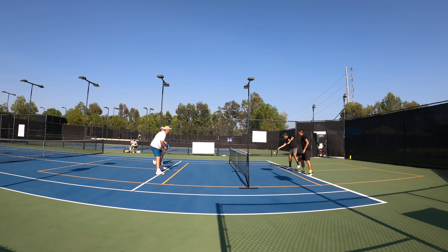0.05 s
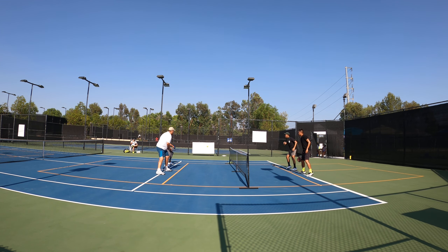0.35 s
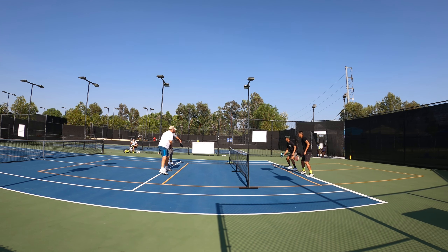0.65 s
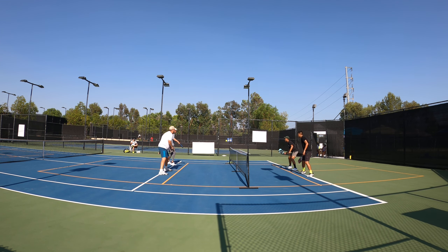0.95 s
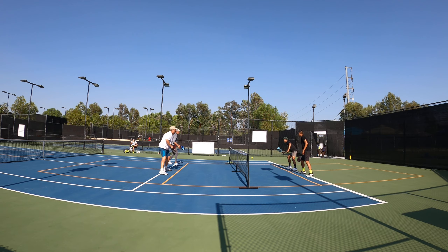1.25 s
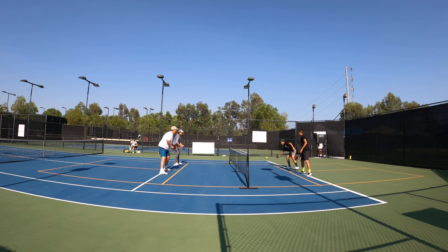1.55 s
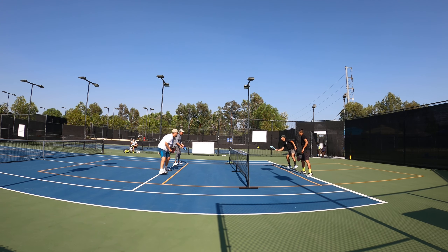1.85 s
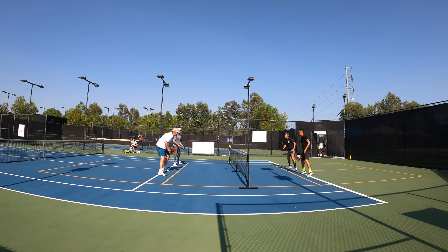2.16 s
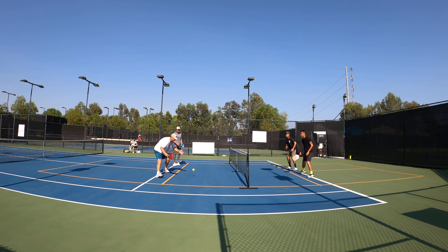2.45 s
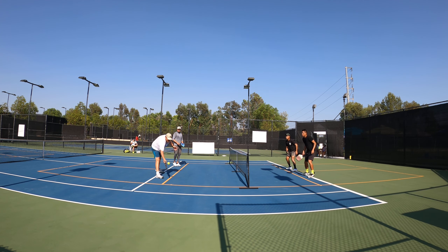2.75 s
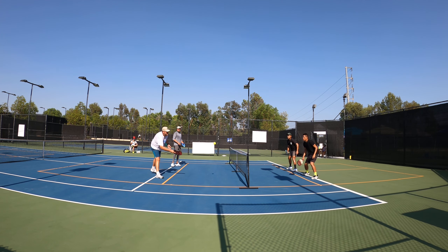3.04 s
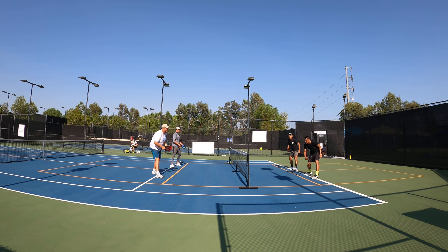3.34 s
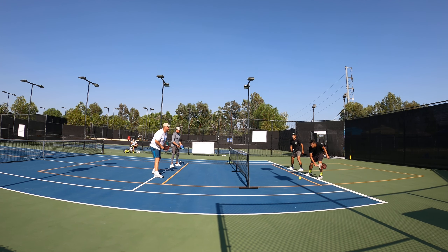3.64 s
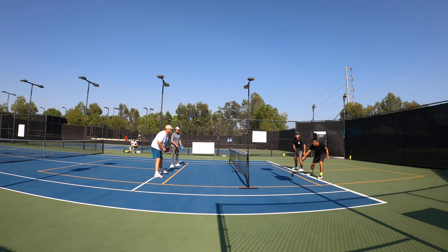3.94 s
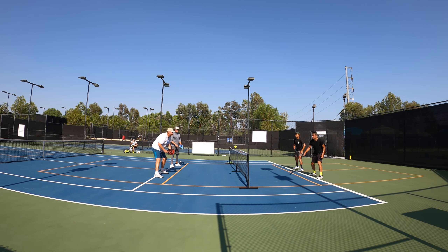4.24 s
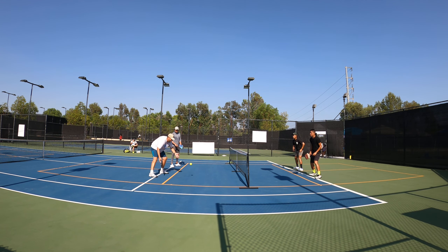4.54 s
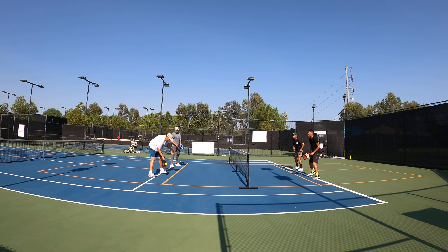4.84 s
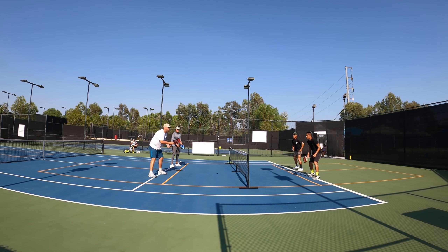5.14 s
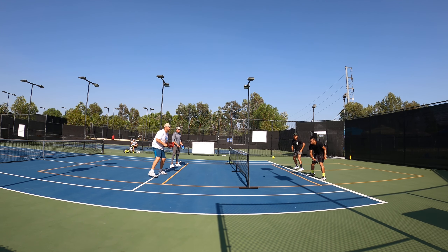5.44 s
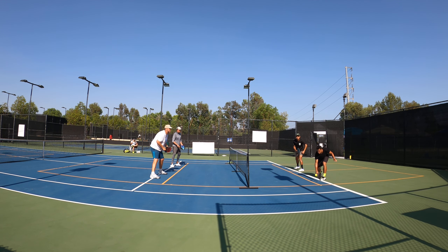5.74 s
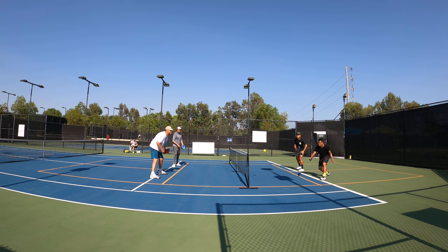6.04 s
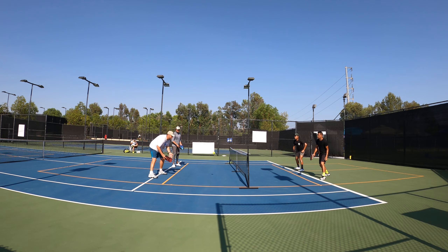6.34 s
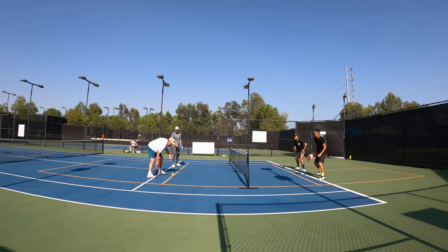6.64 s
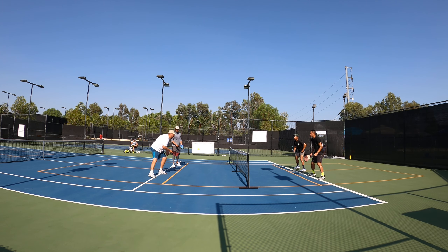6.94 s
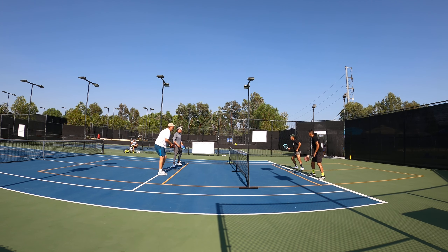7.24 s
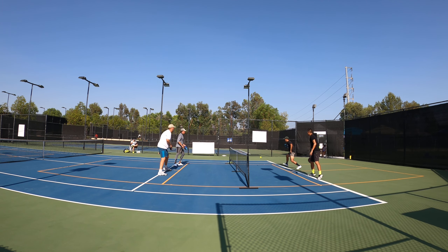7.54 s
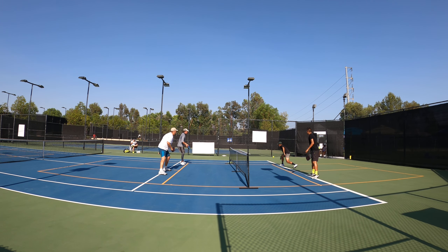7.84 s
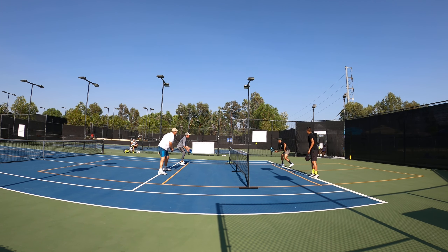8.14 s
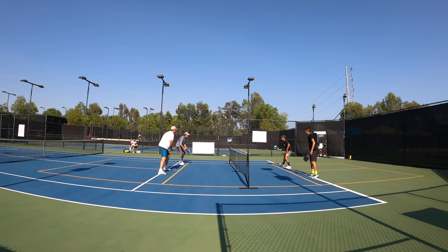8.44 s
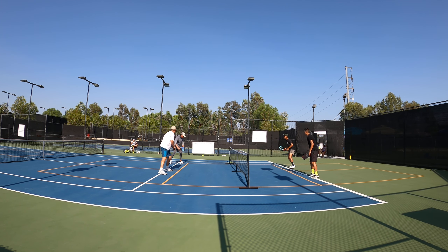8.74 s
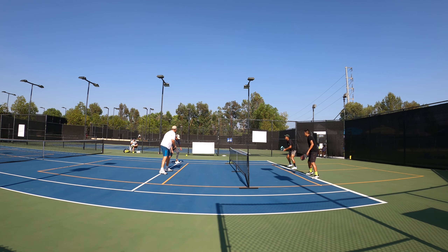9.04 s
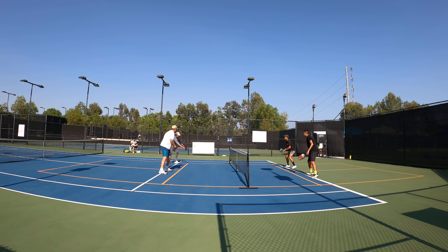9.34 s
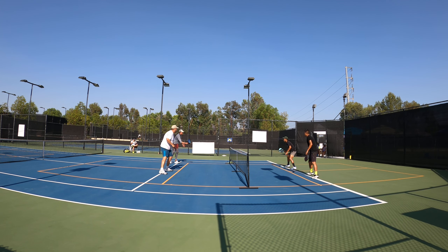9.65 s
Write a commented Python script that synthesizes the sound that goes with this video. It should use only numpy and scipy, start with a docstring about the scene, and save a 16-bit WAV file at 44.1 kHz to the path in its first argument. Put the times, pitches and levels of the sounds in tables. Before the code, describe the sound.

A pickleball rally is heard from beside the net on an outdoor hard court, over a steady low hum of distant traffic and very faint bird trills. It opens with short sneaker squeaks, a few dull distant pops and sharp, hollow paddle hits at about 0.2 and 0.7 seconds. Another hit comes at 1.9, and the plastic ball clicks on the court several times between 1.5 and 3 seconds, with a squeak at 2.4. From 4 seconds the paddles pop about once a second, at 4, 5, 6, 7 and 8.1, each just after a bounce and each with a short echo from the fences. Rubber soles scuff over grit throughout, squeaking around 4.7, 6.5 and 7.4 seconds. Near 9 seconds a shoe skids and squeaks, the ball bounces twice more, and a vehicle's hum rises slightly at the end.

```python
"""A pickleball rally outdoors

Heard from beside the net: paddles pop like stiff drumheads, and the hollow plastic ball clicks
as it bounces on the hard court. Rubber soles scuff over grit and squeak as they stick and slip.
The fences throw back echoes, and there are a few dull, distant paddle pops.
Distant traffic and its engines hum underneath, and far birds trill faintly."""
import sys
import numpy as np
from scipy import signal
from scipy.fft import rfft, irfft, next_fast_len
from scipy.io import wavfile
from scipy.ndimage import map_coordinates

SR = 44100
rng = np.random.default_rng(int(sys.argv[2]) if len(sys.argv) > 2 else 0)


def pcm_store(signal):
    """Save signal as 16-bit PCM."""
    levels = np.round(np.clip(np.atleast_2d(signal), -1, 1) * 32767)
    wavfile.write(sys.argv[1], SR, levels.astype(np.int16).T)


N = 431722

# In the tables, t is time, f is frequency and t60 is the time a sound takes to fade by 60 dB.
# Pan is left minus right. Hardness is the frequency above which a hit is dulled.
# slowly swelling traffic: t/s, rumble level/dB, tyre hiss level/dB
TRAFFIC_LEVELS = [(0.0, -30, -49.5), (0.24, -32.5, -48), (3.02, -31, -47.5), (3.21, -31.5, -49),
                  (3.63, -30.5, -48), (9.16, -29.5, -47.5), (9.79, -29, -49)]
# tone colour of road rumble and of tyre hiss: f/Hz, level/dB
RUMBLE_SPECTRUM = [(15, -9), (30, -12), (50, -4), (65, -1), (85, -0.5), (120, -3), (160, -10), (220, -12),
                   (300, -19), (450, -29.5), (800, -38), (2000, -91.5)]
TYRE_SPECTRUM = [(150, -17), (400, -1.5), (700, -3), (1000, 2.5), (1300, 0.5), (1800, -4), (2500, -11.5),
                 (3500, -19), (4500, -23.5), (7000, -29.5), (9500, -39), (12500, -47.5), (16000, -63)]
# firing tones of three distant engines: t/s, f/Hz, level/dB
FIRING_A = [(0, 125.8, -36), (1.2, 129.3, -40.5), (2.5, 134.9, -37), (3.8, 128.5, -36), (5.2, 134.9, -37),
            (6.3, 146.2, -30.5), (7.1, 150.1, -34), (7.6, 151.3, -33), (8.3, 153.3, -48),
            (9.79, 138.3, -32.5)]
FIRING_B = [(0, 112.7, -48.5), (2.4, 111.4, -38), (3.8, 111, -30), (4.8, 114.1, -41), (6.002, 114.9, -33.5),
            (7.2, 122.4, -31.5), (8.2, 121.6, -31), (8.999, 116.2, -33), (9.79, 113.6, -31.5)]
FIRING_C = [(0, 177.1, -56.5), (0.999, 179.2, -37), (1.6, 173.9, -48.5), (2.7, 178.4, -34.5),
            (3.4, 175.8, -47), (3.9, 175.2, -39), (4.6, 170.8, -48.5), (9.79, 172.4, -68)]
# a vehicle drawing near: t/s, level/dB
VEHICLE_SWELL = [(0, -74), (8.6, -55), (9.2, -52.5), (9.5, -34.5), (9.79, -34.5)]
# the tones in its hum: f/Hz, level/dB
VEHICLE_TONES = [(194, -7.5), (222, -2.5), (248, -5), (280, -20.5), (307, -10), (334, -11.5)]
# far bird trills: t/s, length/s, start f/Hz, end f/Hz, level/dB
BIRD_TRILLS = [(0.019, 0.21, 4100, 4120, -63), (1.002, 0.16, 4100, 4330, -68),
               (2.09, 0.33, 4560, 4260, -62.5), (2.113, 0.26, 3440, 3270, -63),
               (5.329, 0.52, 4330, 4360, -64), (6.05, 0.57, 4470, 4670, -68.5),
               (7.078, 0.17, 4500, 4240, -64)]
# tone colour of the court's echo tail: f/Hz, level/dB
TAIL_SPECTRUM = [(150, -14.5), (500, -10.5), (900, 8), (2000, 4.5), (4000, 2), (8000, -2.5), (14000, -22)]
# fence echoes, duller from further away: delay/s, level/dB, top f/Hz
FENCE_ECHOES = [(.031, -38.5, 5970), (.0615, -36, 4930), (.142, -25.5, 1200), (.2, -24, 1510)]
# tone colour of grit under a sole: f/Hz, level/dB
GRIT_SPECTRUM = [(500, -27), (1500, 1), (3000, 5.5), (5000, 1.5), (7000, 0.5), (9000, -10.5), (12500, -16),
                 (14000, -33), (16000, -40)]
# soles sliding on gritty paint, plus the short hiss of the distant pop at 8.19 s: middle t/s, length/s,
# level/dB, tilt/(dB per octave)
SOLE_SCUFFS = [(0.298, 0.04, -51, -2), (0.472, 0.035, -46, -15), (0.573, .11, -46, -7),
               (0.567, 0.099, -59, -11), (0.605, 0.048, -50.5, -1.5), (0.683, 0.022, -53, 4),
               (1.185, .1, -71, 8), (2.262, 0.26, -56, -1.5), (2.376, 0.06, -43, -1.5),
               (2.672, 0.12, -45, -1.5), (2.866, 0.052, -44, -7), (2.928, 0.17, -63, 16),
               (3.359, 0.19, -58, -3.5), (3.643, 0.064, -45, -8), (3.86, 0.051, -57, 2),
               (4.204, 0.39, -62.5, -3), (4.653, 0.016, -44.5, -2), (5.322, 0.046, -42.5, -4.5),
               (5.816, 0.32, -65, 3), (6.407, 0.054, -46.5, -6), (6.465, 0.078, -40.5, -10),
               (6.502, 0.031, -45.5, -5), (7.243, .037, -60, 15), (7.321, 0.11, -53, 3),
               (7.398, 0.1, -45.5, -4.5), (7.485, 0.18, -63, 7), (7.826, 0.22, -60.5, -2),
               (8.037, 0.26, -47, -1.5), (8.19, 0.013, -30, -13.5), (8.47, 0.021, -55, -4),
               (8.585, 0.087, -56, -1.5), (8.72, 0.02, -38.5, -14), (8.746, 0.038, -47.5, -3.5),
               (8.948, .45, -53, -8), (9.104, .06, -45, -5), (9.214, 0.11, -48, -5.5)]
# small sharp ticks (shoe taps, echoed ball clicks, clicks of distant pops): t/s, level/dB, hardness/Hz
SMALL_TICKS = [(.276, -32, 4000), (0.362, -24.5, 2190), (.391, -30.5, 4000), (3.03, -45, 6000),
               (4.7169, -20, 5250), (4.7995, -41.5, 4550), (4.8775, -43, 4990), (4.913, -38.5, 6900),
               (5.095, -49, 6000), (5.739, -43, 5000), (6.543, -37.5, 6470), (6.7, -40.5, 4460),
               (6.937, -35.5, 6000), (8.164, -41.5, 6000), (8.279, -43.5, 6000), (9.4724, -35.5, 6480)]
# treads rasping in a skid: t/s, length/s, centre f/Hz, level/dB
TREAD_RASPS = [(0.42, 0.021, 2380, -35), (0.446, 0.035, 2400, -36), (0.51, 0.11, 2170, -55),
               (4.718, 0.045, 3300, -49), (4.74, 0.048, 5650, -71), (6.488, .02, 3900, -50),
               (7.415, 0.068, 2740, -49), (8.72, 0.66, 1460, -52), (9.17, 0.09, 1920, -40.5),
               (9.184, 0.13, 3600, -59), (9.177, .06, 5300, -56)]
# soles squeaking: t/s, length/s, f/Hz, level/dB, roughness (0-1), share of pitch lost,
# overtones/dB, chatter/dB, echo delay/s, echo/dB (the last three levels relative to the squeak)
SOLE_SQUEAKS = [(0.003, 0.014, 2160, -31, 0.9, 0.14, -6, -2, 0.034, -11),
                (0.017, 0.032, 2000, -27, 0.23, 0.1, -17.5, -5.5, 0.041, -18),
                (0.415, 0.018, 2623, -26, 0.55, 0.045, -15, -26, 0.045, -14),
                (0.429, 0.018, 1946, -19.5, 0.62, 0.23, -17, -16, .028, -28),
                (0.471, 0.023, 2040, -31.5, 0.4, 0.24, -21, -5, 0.049, -21),
                (0.997, 0.03, 2150, -50, 0.05, 0.041, -26, -18, 0.034, -20),
                (1.364, .017, 2070, -37, 0.36, 0.15, -24, -13, 0.041, -15),
                (1.747, 0.015, 2220, -40, 0.44, 0.18, -29, -25, .04, -18),
                (2.3942, 0.0041, 2805, -20, 0, -0.029, -30, -22, .012, -28),
                (2.692, .016, 1890, -35, 0.35, 0.31, -26, -9, 0.047, -12),
                (2.897, 0.015, 2550, -39, 0.37, 0.15, -29, -5, .04, -26),
                (3.63, 0.019, 3130, -37.5, 0.55, 0.13, -27, -16, 0.072, -18),
                (4.717, 0.014, 3290, -30, 0.5, 0.31, -26, -45, 0.066, -15),
                (4.742, 0.012, 2854, -29.5, 0.5, 0.053, -21, -11, 0.024, -15),
                (4.751, 0.0075, 2920, -38.5, 0.5, 0.093, -20, -18, .048, -4),
                (5.307, 0.012, 3090, -41, 0.34, 0.063, -21, -21, 0.048, -14),
                (6.467, 0.011, 2240, -43, 0.6, 0.19, -22, -6, 0.029, -20),
                (6.543, 0.013, 2780, -32, 0.42, 0.09, -13.5, -27, .05, -18),
                (6.556, 0.013, 2980, -39.5, 0.4, 0.01, -26, -22, .06, -12),
                (6.568, 0.013, 2830, -36, .2, 0.12, -20, -25, .013, -11),
                (7.353, 0.053, 3020, -47.5, 0.67, .12, -21, -22, .059, -20),
                (7.418, 0.015, 2664, -22, 0.18, 0.21, -18.5, -23, 0.059, -20.5),
                (7.428, .022, 2625, -38.5, 0.08, -0.085, -17, -3, 0.081, -14),
                (9.195, 0.023, 1734, -22, 0.03, 0.0097, -21, -10, 0.056, -8.5),
                (9.224, 0.028, 1762, -26.5, 0, 0.0023, -28, -13, 0.043, -13.5)]
# ringing tones of the ball's shell: f/Hz, level/dB, t60/s
SHELL_TONES = [(1544, -11, 0.012), (1800, -1, 0.0045), (2560, -13.5, 0.013), (3040, -6.5, 0.0095),
               (4520, -6, 0.0053), (5190, 3, 0.0021), (7400, -10, 0.002), (8500, -6.5, 0.0018),
               (12300, 2.5, 0.00092)]
# overtones of the paddle's face: multiple of its pitch, level/dB, t60/s
FACE_TONES = [(1.447, 1, 0.034), (1.93, -17, 0.022), (2.25, -5.5, 0.019)]
# the paddle's recoil, a low knock of the whole blade: f/Hz, level/dB, t60/s
RECOIL_TONES = [(316, 3.5, 0.0072), (512, -5, 0.011)]
# dull, distant paddle pops and paddle echoes: t/s, f/Hz, face level/dB, crack level/dB, pan/dB
DULL_POPS = [(0.210, 780, -31, -57, -2), (0.270, 850, -18, -48, -2), (0.382, 930, -29, -62, 10),
             (8.186, 1110, -33, -23, 8)]
# the ball bouncing on the court: t/s, level/dB, hardness/Hz, pan/dB
BALL_BOUNCES = [(1.5602, -26.5, 7800, 1), (2.127, -24, 2500, -.5), (2.7059, -20, 11700, 2),
                (2.96, -19.5, 6960, -1.5), (3.846, -17.5, 4200, -2), (4.1408, -19.5, 1800, 1),
                (4.8499, -17.5, 8060, 1), (5.8636, -19, 4000, -2.5), (6.8202, -24, 8500, -0.5),
                (7.865, -18.5, 3800, -1.5), (9.0581, -21, 5970, 0), (9.432, -21.5, 4030, 1)]
# paddle strokes: t/s, recoil level/dB, face f/Hz, face level/dB, face t60/s, face overtones/dB,
# crack level/dB, hardness/Hz, shell f/Hz, shell level/dB, echo delay/s, echo level/dB,
# ball's stay on the face/s, end fence echo level/dB, pan/dB
PADDLE_STROKES = [(0.2430, -53.5, 844, -26.5, 0.1, 0, -17, 3900, 1740, -14.5, 0.034, -11.5, 0.0027, -25, -1),
                  (0.6931, -20.5, 825, -24.5, 0.089, -17.5, -17.5, 7100, 1698, -22, 0.045, -5, .0016, -8, 0.5),
                  (1.8979, -14, 860, -17, 0.044, -6, -20, 4450, 2890, -19, 0.039, -31.5, 0.0006, -28.5, -2.5),
                  (3.9837, -20, 1157, -27.5, 0.12, -22, -18, 3750, 2620, -19.5, 0.021, -28, 0.00061, -26, -2),
                  (5.0348, -18.5, 1150, -37, 0.13, 6.5, -17.5, 9300, 3130, -18, 0.057, -20, 0.00055, -23.5, 0),
                  (5.9525, -20, 1160, -32.5, 0.11, -1.5, -19, 5520, 3297, -36, 0.015, -7, 0.00054, -22, -3.5),
                  (6.956, -19, 1176, -21.5, 0.053, -18.5, -20, 5360, 3960, -34, 0.0606, -5, 0.0013, -20.5, -0.5),
                  (8.133, -16.5, 860, -20, 0.069, -13, -19.5, 3220, 3612, -27, 0.044, -15, 0.00062, -24, -1)]
# how far the left microphone leads the right (negative: it lags): f/Hz, phase/rad
LEFT_MIC_PHASE = [(30, -0.7), (250, 0.36), (600, -0.2), (1200, -0.3), (3000, -1.1), (6000, -1.7),
                  (12000, -3)]
# tone colour of the right microphone: f/Hz, level/dB
RIGHT_MIC_SPECTRUM = [(30, -1), (300, -2.5), (600, -3), (1200, -1.3), (2500, -3.5), (4500, -1.5),
                      (7000, -0.5), (10000, 3), (13000, 6.5)]

SOLE_LOW_CUT = 0.67   # a sole gives off little sound below this share of its pitch


def from_db(db):
    """Turn decibels into a gain."""
    return 10 ** (np.asarray(db) / 20)


def fade(t, t60, db=0):
    """A gain that starts at db and drops 60 dB every t60 seconds."""
    return from_db(db - 60 * t / t60)


def rms_one(x):
    """Scale a sound to an average power of 1."""
    return x / np.sqrt(np.mean(x ** 2) + 1e-20)


def in_time(rows):
    """Stretch each column of a timed table over all the samples."""
    times, *columns = np.transpose(rows)
    return [np.interp(np.arange(N) / SR, times, column) for column in columns]


def add(track, s, sound):
    """Mix a sound into a stereo track at s seconds."""
    i = max(round(s * SR), 0)
    track[:, i:i + sound.shape[-1]] += sound[..., :N - i]


def panned(x, pan_db):
    """Lean a sound to the left by pan_db."""
    return x * from_db(pan_db / 2 * np.array([[1], [-1]]))


def over_frequency(points, size):
    """Spread (Hz, value) points over the frequencies of an FFT."""
    hz, values = np.transpose(points)
    return np.interp(np.log(np.fft.rfftfreq(size, 1 / SR) + 1), np.log(hz), values)


def coloured(x, spectrum):
    """Shape a sound's tone colour with (Hz, dB) points."""
    size = next_fast_len(x.shape[-1] + 512)
    gain = from_db(over_frequency(spectrum, size))
    return irfft(rfft(x, size) * gain, size)[..., :x.shape[-1]]


def soften(x, hz):
    """Turn down the treble above hz."""
    return signal.sosfilt(signal.butter(2, min(hz, SR / 2 - 2000), fs=SR, output="sos"), x)


def thin(x, hz):
    """Turn down the bass below hz."""
    return signal.sosfilt(signal.butter(2, hz, "high", fs=SR, output="sos"), x)


def drift(rate, size):
    """A smooth random wobble through rate new values a second."""
    knots = rng.standard_normal(4096)
    return map_coordinates(knots, [np.arange(size) * rate / SR], order=3, mode="wrap")


def slow_drift(rate, step=100):
    """A wobble as long as the scene, worked out in coarse steps."""
    coarse = drift(rate * step, N // step + 2)
    return np.interp(np.arange(N) / step, np.arange(len(coarse)), coarse)


def white_noise(size, likeness):
    """Stereo hiss; a likeness of 1 makes both sides the same."""
    mid, side = rng.standard_normal((2, size))
    return rms_one(np.sqrt(1 + likeness) * mid + np.sqrt(1 - likeness) * np.array([side, -side]))


def steady_noise(spectrum, likeness):
    """Coloured noise as long as the scene."""
    return rms_one(coloured(white_noise(N, likeness), spectrum))


def ring(hz, t60):
    """One fading tone of something struck."""
    t = np.arange(SR // 8) / SR
    return np.sin(2 * np.pi * hz * t) * fade(t, t60)


def engine_tone(hz, db, wander_hz=1.466, waver_db=2.3):
    """A far engine's firing tone fades in and out on the moving air."""
    phase = 2 * np.pi * np.cumsum(hz + wander_hz * slow_drift(rate=7)) / SR
    return from_db(db) * rms_one(np.sin(phase) * from_db(waver_db * slow_drift(rate=6)))


def traffic(rumble_trim_db=1.33, tyre_trim_db=3.5, engine_trim_db=-1):
    """Road rumble, tyre hiss, engines slowly changing speed and a vehicle drawing near."""
    rumble_db, tyre_db = in_time(TRAFFIC_LEVELS)
    rumble = from_db(rumble_db + rumble_trim_db) * steady_noise(RUMBLE_SPECTRUM, likeness=0.99)
    tyres = from_db(tyre_db + tyre_trim_db) * steady_noise(TYRE_SPECTRUM, likeness=0.54)
    engines = sum(engine_tone(*in_time(rows)) for rows in (FIRING_A, FIRING_B, FIRING_C))
    swell = from_db(in_time(VEHICLE_SWELL)[0])
    vehicle = swell * sum(engine_tone(hz, db) for hz, db in VEHICLE_TONES)
    return rumble + tyres + from_db(engine_trim_db) * (engines + vehicle)


def birds(flutter_db=3, smear=0.048):
    """Far trills, smeared by the trees into thin wavering bands."""
    out = np.zeros((2, N))
    for s, length, start_hz, end_hz, db in BIRD_TRILLS:
        n = int(length * SR)
        hz = np.linspace(start_hz, end_hz, n) * (1 + smear * drift(600, n))
        trill = np.sin(2 * np.pi * np.cumsum(hz) / SR) * from_db(flutter_db * drift(72.5, n))
        add(out, s, from_db(db) * rms_one(trill) * signal.windows.tukey(n, 0.5))
    return out


def court_echoes(x, near_db=-17, tail_db=-16, lumps_db=3):
    """Nearby scatter, dull fence echoes and a faint tail that returns in lumps from trees and walls."""
    t = np.arange(SR) / SR
    lumps = from_db(lumps_db * drift(72.3, SR))
    noise = rms_one(coloured(rng.standard_normal((2, SR)), TAIL_SPECTRUM))
    tail = rms_one(noise * lumps * fade(t, t60=0.29))
    near = rms_one(rng.standard_normal((2, SR)) * fade(t, t60=0.11))
    response = (from_db(tail_db) * tail + from_db(near_db) * soften(near, hz=6000)) / np.sqrt(SR)
    for delay, db, top_hz in FENCE_ECHOES:
        click = signal.unit_impulse(SR, int(delay * SR)) + 1e-18
        response += from_db(db) * soften(click, top_hz)
    return signal.fftconvolve(x, response, axes=1)[:, :N]


def fence_echo(x, top_hz, scatter_db=-8, linger_db=-5):
    """One clear echo, a tail scattered by the wire mesh and a dull wash lingering between the fences."""
    t = np.arange(SR // 2) / SR
    scatter = rms_one(white_noise(len(t), likeness=0.7) * fade(t, t60=0.37))
    linger = soften(rms_one(white_noise(len(t), likeness=0.7) * fade(t, t60=0.71)), hz=2000)
    response = (from_db(scatter_db) * scatter + from_db(linger_db) * linger) / np.sqrt(len(t))
    response[:, 0] += 1   # the clear echo
    return soften(signal.fftconvolve(np.atleast_2d(x), response, axes=1), top_hz)


def slide(length, tilt_db, grain_db=3, catch_db=2.5):
    """A sole drags over grit: a grainy hiss that swells and fades."""
    n = int(length * SR)
    grains = white_noise(n, likeness=0.2) * from_db(grain_db * rng.standard_normal(n))
    hiss = coloured(grains, [(hz, db + tilt_db * np.log2(hz)) for hz, db in GRIT_SPECTRUM])
    catching = from_db(catch_db * drift(200, n))
    return rms_one(hiss / np.std(hiss) * catching) * np.sin(np.linspace(0, np.pi, n))


def scuffs_and_ticks(shuffles_per_s=1.2, shuffle_s=0.11, shuffle_db=-68):
    """Sliding steps, the hiss of the pop at 8.19 s, small sharp ticks, and faint shuffles at random times."""
    out = np.zeros((2, N))
    for middle_s, length, db, tilt_db in SOLE_SCUFFS:
        add(out, middle_s - length / 2, from_db(db) * slide(length, tilt_db))
    t = np.arange(SR // 20) / SR
    for s, db, hardness_hz in SMALL_TICKS:
        tick = white_noise(len(t), likeness=1) * fade(t, t60=0.026, db=db)
        add(out, s, soften(tick, hardness_hz))
    for when, size in rng.random((int(shuffles_per_s * N / SR), 2)):
        add(out, when * N / SR, from_db(shuffle_db) * slide(shuffle_s * (0.5 + size), tilt_db=9))
    return out


def tread_rasp(length, hz):
    """Grit shakes the tread, which rasps in a broad band around its own pitch."""
    n = int(length * SR)
    band = signal.lfilter(*signal.iirpeak(hz, Q=5, fs=SR), white_noise(n, likeness=0.8))
    return rms_one(thin(soften(band, 2 * hz), hz) * np.sin(np.linspace(0, np.pi, n)))


def stick_slip(length, pitch_hz, rough, sag, overtones_db, jitter=0.09, judder_db=5, flutter_db=3):
    """Rubber sticks and slips at a gliding rate; a rough slip wavers in pitch, judders and rasps."""
    n = int(length * SR)
    glide_hz = pitch_hz * (1 + sag * np.linspace(0.5, -0.5, n))
    hz = glide_hz * (1 + jitter * rough * drift(1100, n))
    # grit trips each cycle early or late, which frays the overtones most
    rasp_radians, rasp_per_s = 0.5 * np.sqrt(rough), 1800
    phase = 2 * np.pi * np.cumsum(hz) / SR + rasp_radians * drift(rasp_per_s, n)
    overtones = np.sin(2 * phase) + from_db(-9) * np.sin(3 * phase)
    overtones *= from_db(overtones_db + flutter_db * drift(700, n))
    grip = from_db(judder_db * rough * drift(595, n))
    grip *= 1 + rasp_radians / 2 * drift(rasp_per_s, n)
    squeal = (np.sin(phase) + overtones) * grip * signal.windows.tukey(n, 0.5)
    return rms_one(thin(squeal, SOLE_LOW_CUT * pitch_hz))


def skids(chatter_rough=0.32, rub_db=-30.5, rough_rub_db=22.5):
    """Braking soles chatter, then catch and squeal over the grit; skidding treads rasp."""
    out = np.zeros((2, N))
    for s, length, hz, db, rough, sag, overtones_db, chatter_db, echo_s, echo_db in SOLE_SQUEAKS:
        squeal = from_db(db) * stick_slip(length, hz, rough, sag, overtones_db)
        chatter = stick_slip(length, hz * (1 + sag / 2), rough + chatter_rough, 0, overtones_db)
        rub_s = 3.2 * length
        rub = thin(slide(rub_s, tilt_db=-3), SOLE_LOW_CUT * hz)
        add(out, s - length, from_db(db + chatter_db) * chatter)
        add(out, s, squeal)
        add(out, s + (length - rub_s) / 2, from_db(db + rub_db + rough_rub_db * rough) * rub)
        add(out, s + echo_s, from_db(echo_db) * fence_echo(squeal, top_hz=6000))
    for s, length, hz, db in TREAD_RASPS:
        add(out, s, from_db(db) * tread_rasp(length, hz))
    return out


def ball_crack(hardness_hz):
    """A tick of contact, then the ball's shell rings briefly; a soft hit sounds duller."""
    # each hit rings a little differently, depending on where the ball's holes lie
    extra_db, detune = rng.normal(0, [1.5, 0.04], (len(SHELL_TONES), 2)).T
    shell = sum((-1) ** k * from_db(db + extra_db[k]) * ring(hz * (1 + detune[k]), t60)
                for k, (hz, db, t60) in enumerate(SHELL_TONES))
    t = np.arange(len(shell)) / SR
    snap = white_noise(len(t), likeness=0.86) * fade(t, t60=0.029, db=-11)
    tick = fade(t, t60=0.00057, db=7)
    return thin(soften(shell + snap + tick, hardness_hz), hz=600)


def paddle_face(hz, t60, overtones_db):
    """The paddle's face rings like a stiff drumhead."""
    overtones = sum((-1) ** k * from_db(db) * ring(hz * multiple, overtone_t60)
                    for k, (multiple, db, overtone_t60) in enumerate(FACE_TONES))
    return ring(hz, t60) - from_db(overtones_db) * overtones


def paddle_core(top_hz=1270):
    """The honeycomb cells inside the paddle give a woody rattle, too dense to have a pitch."""
    t = np.arange(SR // 8) / SR
    cells = thin(soften(white_noise(len(t), likeness=0.9), top_hz), top_hz / 2)
    return rms_one(cells) * fade(t, t60=0.043, db=-13)


def dull_pops(rise_s=0.0019):
    """Dull, distant paddle pops and paddle echoes; distance blunts the start of their ring."""
    out = np.zeros((2, N))
    for s, hz, face_db, crack_db, pan_db in DULL_POPS:
        face = from_db(face_db) * paddle_face(hz, t60=0.055, overtones_db=-6)
        rise = 1 - np.exp(-np.arange(len(face)) / SR / rise_s)
        pop = rise * face + from_db(crack_db) * ball_crack(hardness_hz=2820)
        add(out, s, panned(soften(pop, hz=2500), pan_db))
    return out


def bounces():
    """On the hard court, the ball makes only its own crack."""
    out = np.zeros((2, N))
    for s, db, hardness_hz, pan_db in BALL_BOUNCES:
        add(out, s, from_db(db) * panned(ball_crack(hardness_hz), pan_db))
    return out


def strokes(ground_echo_s=0.0065, ground_echo_db=-17, end_fence_s=0.12):
    """The ball cracks on the paddle; as it pushes in, the blade recoils and the face rings."""
    out = np.zeros((2, N))
    recoil = sum(from_db(db) * ring(hz, t60) for hz, db, t60 in RECOIL_TONES)
    for (s, recoil_db, face_hz, face_db, t60, overtones_db, crack_db, hardness_hz, shell_hz, shell_db,
         echo_s, echo_db, stay_s, end_fence_db, pan_db) in PADDLE_STROKES:
        paddle = from_db(face_db) * paddle_face(face_hz, t60, overtones_db)
        paddle = paddle + from_db(crack_db) * paddle_core()
        ball = from_db(crack_db) * ball_crack(hardness_hz)
        ball += from_db(shell_db) * ring(shell_hz, t60=0.011)   # the tone this stroke brings out
        for start, part in ((s, -ball), (s + stay_s, from_db(recoil_db) * recoil + paddle)):
            direct = panned(part, pan_db)
            add(out, start, direct)
            add(out, start + ground_echo_s, from_db(ground_echo_db) * soften(direct, hz=3000))
        # the face beams the bright part of its pop at the fences
        add(out, s + echo_s, from_db(echo_db) * fence_echo(ball + from_db(-3) * paddle, top_hz=3000))
        add(out, s + end_fence_s, from_db(end_fence_db) * soften(ball + paddle, hz=1400))
    return out


def scene(shoe_echo_db=-3, ball_echo_db=1):
    """The players and their echoes over traffic and birds; shoes, down at the ground, echo less."""
    rally = strokes() + bounces() + dull_pops()
    shoes_and_ticks = skids() + scuffs_and_ticks()
    echoes = court_echoes(from_db(ball_echo_db) * rally + from_db(shoe_echo_db) * shoes_and_ticks)
    return rally + shoes_and_ticks + echoes + traffic() + birds()


def record(dry, breeze_db=-42, top_hz=15000):
    """Two microphones on one small body: the right mostly hears earlier, quieter and brighter."""
    size = next_fast_len(N + 512)
    phase_shift = np.exp(1j * over_frequency(LEFT_MIC_PHASE, size))
    left = irfft(rfft(dry[0], size) * phase_shift, size)[:N]
    right = coloured(dry[1], RIGHT_MIC_SPECTRUM)
    # a light breeze buffets each microphone on its own
    breeze = steady_noise([(12, 4.5), (28, -1.5), (60, -18.5), (150, -30.5), (1000, -83)], likeness=0)
    mics = np.array([left, right]) + from_db(breeze_db) * breeze
    treble_cut = signal.cheby1(10, 0.5, top_hz, fs=SR, output="sos")
    return signal.sosfilt(treble_cut, mics)


dry = scene()
out = record(dry)
pcm_store(out)
```